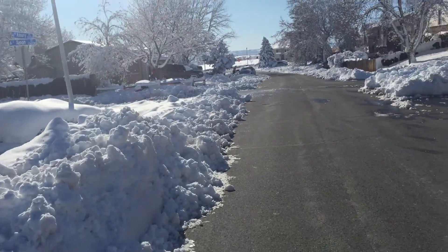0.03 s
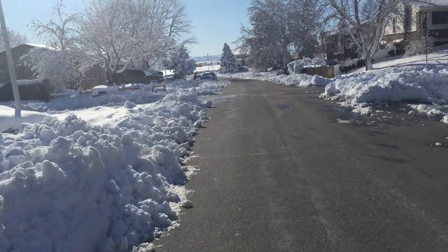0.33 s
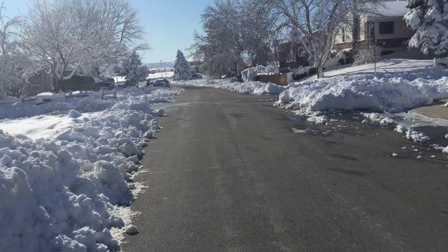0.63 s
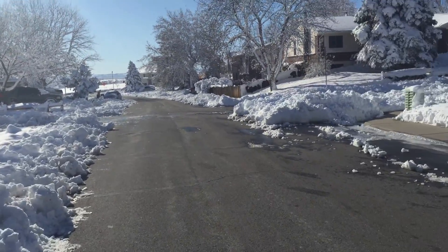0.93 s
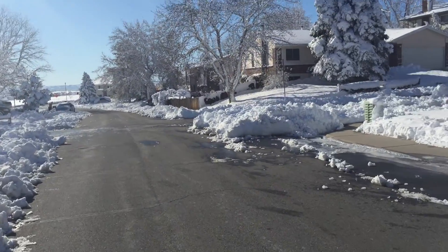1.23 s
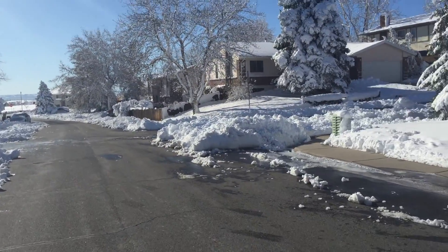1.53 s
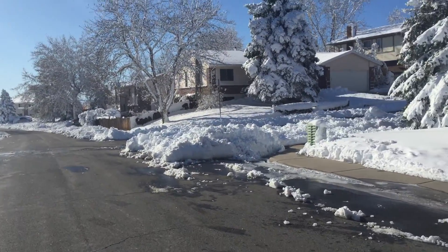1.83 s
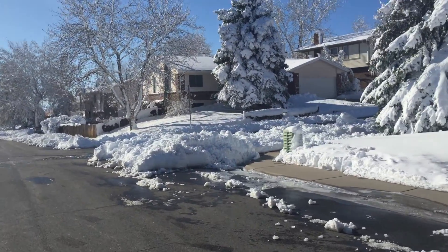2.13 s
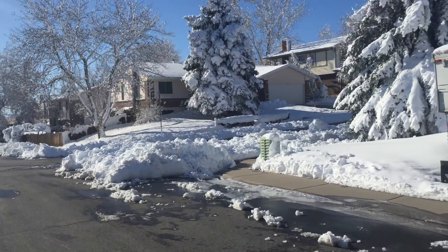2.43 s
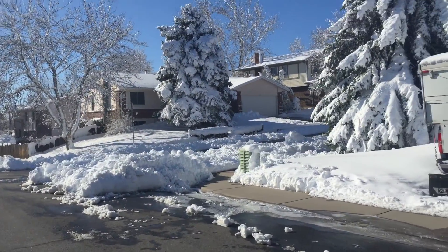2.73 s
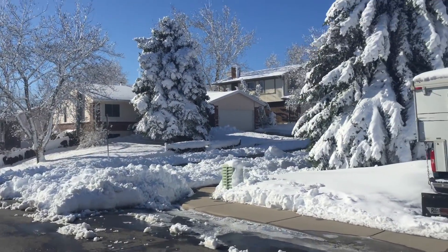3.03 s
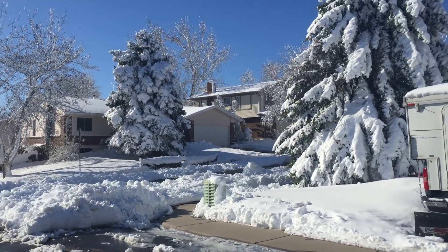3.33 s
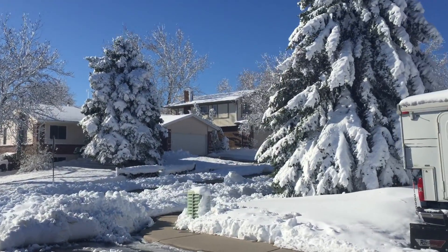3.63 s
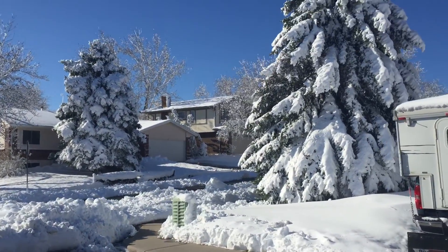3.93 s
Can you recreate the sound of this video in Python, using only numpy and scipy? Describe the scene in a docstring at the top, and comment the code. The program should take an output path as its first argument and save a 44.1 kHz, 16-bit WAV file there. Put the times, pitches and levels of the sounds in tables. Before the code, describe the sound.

A small bird warbles quick slurred notes, then gives a rising whistle and two buzzy notes in a snowy street. Low wind buffets the hand-held microphone, with soft handling knocks, faint drips and a hush of far traffic.

```python
"""Wind buffets the microphone of a hand-held camera, which picks up soft knocks as it moves.
All along, melting snow drips and ticks over the hush of far traffic and a faint whine.
From 0.2 s a finch warbles quick slurred syllables; at 2.6 s it gives a rising whistle,
and from 2.9 s two buzzy notes. A far, hoarse call comes just before the end.
The houses of the snowy street return a faint echo of the birds and the thaw."""
import sys
import numpy as np
from scipy import signal
from scipy.fft import rfft, irfft
from scipy.io import wavfile
from scipy.ndimage import uniform_filter1d, map_coordinates

SR = 44100
rng = np.random.default_rng(int(sys.argv[2]) if len(sys.argv) > 2 else 0)


def inscribe(sig):
    """Save sig as 16-bit PCM at rate SR to the path in sys.argv[1].

    A 1-D sig is mono; a 2-D sig holds one channel per row.
    Samples are clipped to [-1, 1] before scaling.
    """
    pcm = np.round(np.clip(np.atleast_2d(sig).T, -1, 1) * 32767)
    wavfile.write(sys.argv[1], SR, pcm.astype(np.int16))


N = 176400  # 4 seconds


def warble():
    """The finch's quick run of syllables, with close reflections."""
    # Each row: start in seconds, length in seconds, level in dB before the trim,
    # then pitch in Hz at the start, one third, two thirds and the end.
    syllables = [ (0.207, 0.052, -69.5, 3730, 3760, 3750, 3300), (0.459, .04, -68, 3600, 4200, 3800, 2900),
                 (0.608, 0.029, -64.5, 4360, 4100, 3940, 3900),
                 (0.75, 0.047, -62.5, 4640, 4260, 4200, 4500), (.88, .055, -57, 4700, 4250, 3450, 2950),
                 (.993, .045, -60, 3550, 3480, 3050, 2850), (1.035, .04, -59, 3200, 4250, 3800, 2900),
                 (1.122, .05, -64, 4200, 4350, 4500, 4000), (1.154, 0.058, -56, 4330, 3640, 2600, 2200),
                 (1.294, 0.045, -60.5, 3140, 3400, 3540, 4000),
                 (1.336, 0.043, -54.5, 3700, 3100, 2940, 2900),
                 (1.427, .038, -51.5, 4330, 4000, 4000, 5000), (1.457, .026, -58, 4050, 4050, 4050, 3950),
                 (1.52, .022, -53, 4400, 4450, 4500, 4550), (1.548, .035, -52, 4700, 4200, 3500, 3050),
                 (1.646, .044, -49, 4200, 4170, 4130, 3950), (1.684, .027, -56, 4050, 3750, 3400, 3150),
                 (1.744, .063, -50, 5100, 4550, 4100, 3900), (1.797, .056, -52, 3950, 3730, 3770, 3680),
                 (1.942, .043, -57, 5000, 4830, 4480, 4350), (1.978, .06, -54, 3400, 3900, 3500, 2900),
                 (2.078, .067, -55, 4200, 3950, 3250, 3000), (2.205, .055, -61, 4100, 3400, 3950, 3600),
                 (2.293, .062, -53, 3350, 2780, 2400, 2030), (2.432, .03, -66, 3550, 3650, 3700, 3650),
                 (2.456, .02, -66, 4500, 4580, 4620, 4600), (2.467, 0.022, -61, 3570, 3600, 3450, 3500),
                 (2.491, 0.043, -56, 3980, 3300, 2800, 2900), (2.899, 0.0206, -58, 3570, 3200, 2900, 3040)]
    # Each row: time in seconds, hoarse share of the voice from 0 to 1.
    hoarseness = [(.2, 0.4), (.9, 0.44), (1.35, .3), (1.52, 0.13), (1.7, 0.14), (2.12, 0.34), (2.24, 0.56),
                  (2.3, 0.16), (2.5, 0.42)]
    out, trim_db = np.zeros(N), -3.5
    for start, length, db, *pitches in syllables:
        hoarse = curve(hoarseness, start)[0]
        add(out, start, amp(db + trim_db) * syllable(length, pitches, hoarse))
    return reflect(out, db=-10, fade_s=0.03)


def syllable(length, pitches, hoarse, fade_share=0.28, blur_hz=373.3):
    """One slide through four pitches that swells and fades; hoarseness blurs the pitch."""
    progress = np.arange(0, length, 1 / SR) / length
    hz = np.polyval(np.polyfit(np.arange(4) / 3, pitches, 3), progress)
    ramp = np.clip(np.minimum(progress, 1 - progress) / fade_share, 0, 1)
    blurred = unit(tone(hz + blur_hz * wander(len(hz), blur_hz)))
    return np.sin(np.pi / 2 * ramp) * unit((1 - hoarse) * voice(hz) + hoarse * blurred)


def voice(hz, jitter=0.005, overtone_db=-41, flutter_hz=132):
    """A bird's nearly pure tone, trembling slightly in pitch and loudness."""
    hz = hz * (1 + jitter * wander(len(hz), 2 * flutter_hz))
    flutter = amp(wander(len(hz), flutter_hz))  # about 1 dB either way
    return unit((tone(hz) + amp(overtone_db) * tone(2 * hz)) * flutter)


def whistle(catch_s=0.0053, catch_db=-26.5):
    """The finch's clean upward glide, broken by short catches where the level dips."""
    # Each row: time in seconds, pitch in Hz, level in dB.
    glide = [(2.61, 2076, -95), (2.645, 2030, -59), (2.668, 2190, -59), (2.703, 2400, -55),
             (2.735, 2610, -55.5), (2.76, 2694, -54.5), (2.8, 2886, -54.5), (2.825, 2890, -62),
             (2.834, 2880, -102)]
    # Each entry: time of a catch in seconds.
    catches = [2.648, 2.684, 2.722, 2.785]
    t = np.arange(glide[0][0], glide[-1][0], 1 / SR)
    hz, db = curve(glide, t)
    dips = sum(np.exp(-((t - s) / catch_s) ** 2) for s in catches)
    out = np.zeros(N)
    add(out, t[0], amp(db + catch_db * dips) * unit(tone(hz)))
    return out


def buzzy_notes():
    """A high note, then a rising one; the finch sings each with two voices at once."""
    # Each row, in all four: time in seconds, pitch in Hz, level in dB, swing of the trill in Hz.
    high_lower = [(2.925, 4520, -87, 24), (2.94, 4310, -60.5, 20), (2.96, 4230, -56.5, 40),
                  (3.0, 4580, -60, 30), (3.014, 4530, -63, 20), (3.024, 4400, -78, 20)]
    high_upper = [(2.935, 5000, -78, 99), (2.957, 5100, -68, 200), (2.985, 5250, -81, 149),
                  (3.02, 5140, -75, 101)]
    rising_lower = [(3.072, 2590, -101, 81), (3.085, 2590, -68.5, 100), (3.125, 2636, -73, 152),
                    (3.145, 2960, -66, 80), (3.185, 2730, -66, 217), (3.222, 2910, -56, 80),
                    (3.255, 3080, -64.5, 150), (3.29, 3020, -70, 149), (3.33, 3340, -65.5, 120),
                    (3.345, 3180, -64, 101)]
    rising_upper = [(3.205, 3350, -73, 99), (3.245, 3920, -67, 250), (3.285, 3950, -60, 195),
                    (3.325, 4000, -64.5, 150), (3.352, 4440, -63.5, 151), (3.372, 4480, -78, 100)]
    return (buzz(high_lower, pulse_hz=257, sweep_hz=130, depth=0.47, trill_hz=64, uneven=0.2)
            + buzz(high_upper, pulse_hz=252, sweep_hz=303, depth=0.92, trill_hz=68, uneven=0.18)
            + buzz(rising_lower, pulse_hz=224, sweep_hz=190, depth=0.4, trill_hz=78.5, uneven=0.2)
            + buzz(rising_upper, pulse_hz=243.5, sweep_hz=220, depth=0.7, trill_hz=74.2, uneven=0.06))


def buzz(rows, pulse_hz, sweep_hz, depth, trill_hz, uneven):
    """Fast pulses, each sliding down in pitch, riding on a slower trill."""
    t = np.arange(rows[0][0], rows[-1][0], 1 / SR)
    hz, db, swing = curve(rows, t)
    pulse_rate = pulse_hz * (1 + uneven * wander(len(t), pulse_hz))
    phase = 2 * np.pi * np.cumsum(pulse_rate) / SR
    trill = np.sin(2 * np.pi * trill_hz * (t - t[0]))
    pitch = hz + swing * trill - sweep_hz * np.sin(phase)
    pulses = 1 + depth * np.cos(phase)
    out = np.zeros(N)
    add(out, t[0], amp(db) * unit(pulses * voice(pitch)))
    return out


def far_call():
    """A distant bird; slower pulses make its call hoarse."""
    # Each row: time in seconds, pitch in Hz, level in dB, swing of the trill in Hz.
    call = [(3.86, 1605, -89, 60), (3.9, 1680, -71.5, 60), (3.935, 1790, -72, 60), (3.96, 1690, -84, 60)]
    return buzz(call, pulse_hz=107, sweep_hz=110, depth=0.34, trill_hz=30.4, uneven=0.24)


def wind(bass_boost_db=1, lumps_db=6):
    """Air swirls at the microphone: a bass rumble and a lumpier flutter above it."""
    # Each row, in both: frequency in Hz, relative strength in dB.
    bass_tone = [(15, -40.5), (30, -3.5), (45, -4.5), (62, 3), (100, -2.5), (140, -9), (190, -31.5),
                 (300, -50), (1000, -100)]
    body_tone = [(60, -27), (120, -12), (165, 7), (230, -4), (300, -12.5), (420, -42), (800, -45),
                 (3000, -86)]
    # Each row, in both: time in seconds, level in dB before the boost or the lumps.
    bass_gusts = [(0.0, -63.5), (0.09, -50), (0.18, -64.5), (0.23, -51.5), (0.3, -63.5), (0.58, -41.5),
                  (0.6, -35), (0.65, -52), (0.97, -44), (1.0, -56), (1.08, -37), (1.16, -48.5), (1.21, -36),
                  (1.32, -42.5), (1.36, -33.5), (1.55, -55.5), (1.61, -23.5), (1.66, -40.5), (1.95, -44),
                  (1.99, -30), (2.07, -41), (2.12, -34.5), (2.46, -32), (2.49, -49.5), (2.55, -30),
                  (2.61, -43), (2.65, -28.5), (2.7, -40), (2.78, -36), (2.83, -44), (2.94, -36),
                  (2.99, -45), (3.09, -47), (3.11, -36), (3.39, -50), (3.43, -36), (3.51, -56.5),
                  (3.63, -36), (3.66, -47), (3.75, -32), (3.82, -59), (3.88, -43.5), (3.98, -38.5),
                  (4.0, -68)]
    body_gusts = [(0.0, -66), (0.46, -66), (0.6, -55.5), (0.71, -68.5), (0.8, -58), (0.89, -69),
                  (0.91, -51), (0.98, -74), (1.0, -55), (1.34, -51.5), (1.47, -56.5), (1.51, -46),
                  (1.54, -58), (1.61, -34.5), (1.65, -65), (1.67, -42), (1.69, -60), (1.75, -53),
                  (1.88, -72), (1.92, -47.5), (1.96, -38.5), (2.06, -58), (2.12, -40.5), (2.16, -64),
                  (2.18, -45.5), (2.39, -41), (2.49, -58), (2.55, -41.5), (2.57, -52), (2.65, -39.5),
                  (2.68, -57), (2.73, -37.5), (2.87, -78), (2.91, -32), (2.93, -48), (2.96, -86),
                  (3.06, -70), (3.1, -46), (3.22, -51.5), (3.25, -62.5), (3.44, -57.5), (3.51, -76),
                  (3.56, -48), (3.6, -61), (3.78, -47), (3.82, -69), (3.84, -54.5), (4.0, -65)]
    t = np.arange(N) / SR
    bass = steady(noise(bass_tone), samples=1800) * amp(curve(bass_gusts, t)[0] + bass_boost_db)
    body = steady(noise(body_tone), samples=1200) * amp(curve(body_gusts, t)[0])
    lumps = unit(amp(lumps_db * wander(N, 45)))
    return bass + body * lumps


def buffets():
    """Heavy, low thumps of wind on the microphone."""
    # Each row: start in seconds, pitch in Hz, level in dB.
    thumps = [(.588, 95.4, -22), (1.6, 80, -23.5), (1.98, 78.5, -30.5), (2.64, 78, -34), (2.918, 97, -27)]
    return taps(thumps, rise_s=0.0086, grit=0.11, spread=0.77)


def knocks():
    """Soft knocks on the moving camera."""
    # Each row: start in seconds, pitch in Hz, level in dB.
    bumps = [(.291, 530, -46.5), (.52, 317, -43), (.549, 256, -43), (.597, 520, -46), (.79, 378, -44),
             (1.321, 466, -51.5), (1.506, 230, -37), (1.565, 740, -47.5), (1.574, 810, -48),
             (1.663, 263, -27.5), (1.754, 600, -49), (1.828, 700, -50), (1.95, 232, -40), (2.289, 322, -43),
             (2.291, 616, -49.5), (2.325, 270, -52), (2.594, 328, -36), (2.717, 580, -43), (2.73, 246, -42),
             (2.906, 315, -35), (3.203, 480, -44), (3.56, 324, -47), (3.7, 600, -46), (3.768, 332, -32.5),
             (3.77, 584, -49), (3.937, 294, -45.5)]
    return taps(bumps, rise_s=0.0027, grit=0.28, spread=0.43)


def thaw():
    """Meltwater drips, and ice gives crisp ticks."""
    # Each row, in both: start in seconds, pitch in Hz, level in dB.
    drips = [(.104, 1940, -54), (.11, 880, -56), (.293, 810, -55.5), (1.08, 1065, -52.5),
             (1.087, 2100, -59.5), (1.239, 1870, -57.5), (1.259, 898, -51.5), (1.505, 1850, -41),
             (1.572, 2070, -56.5), (1.579, 935, -42.5), (1.897, 1280, -59.5), (2.179, 2050, -57.5),
             (2.551, 1600, -57.5), (3.006, 1090, -53), (3.507, 790, -54), (3.754, 1690, -63.5)]
    ticks = [(.407, 4450, -64), (.947, 5700, -69), (1.239, 4960, -57.5)]
    return (taps(drips, rise_s=0.0032, grit=0.62, spread=0.4)
            + taps(ticks, rise_s=0.002, grit=1.0, spread=0.24))


def patter(count=70, low_hz=600, high_hz=2400):
    """Many faint, far drips at random moments."""
    rows = []
    for when, height, strength in rng.random((count, 3)):
        hz = low_hz * (high_hz / low_hz) ** height
        db = -63 + 2 * np.log(strength + 0.2)
        rows.append((when * N / SR, hz, db))
    return taps(rows, rise_s=0.002, grit=0.33, spread=1.0)


def taps(rows, rise_s, grit, spread):
    """Rings that die fast. Grit is their share of noise; spread is its width around the pitch."""
    out, t = np.zeros(N), np.arange(8192) / SR
    freqs, shape = np.fft.rfftfreq(len(t), 1 / SR), swell(t / rise_s)
    for start, hz, db in rows:
        band = 1 / (1 + (np.log((freqs + 1) / hz) / spread) ** 4)
        rough = shape * irfft(rfft(rng.standard_normal(len(t))) * band)
        rough *= np.linalg.norm(shape) / np.linalg.norm(rough)
        ring = shape * np.sin(2 * np.pi * hz * t)
        add(out, start, amp(db) * ((1 - grit) * ring + grit * rough))
    return out


def hush(split_hz=2520, waver_db=3.2):
    """Far traffic and air: a wavering murmur under a steadier hiss."""
    # Each row: frequency in Hz, relative strength in dB.
    air_tone = [(180, -26), (300, 4.5), (354, 1), (467, -7.5), (682, -0.5), (844, -7.5), (932, -6.5),
                (1320, -12.5), (2050, -10.5), (2940, -20.5), (4220, -19), (8840, -25.5), (10400, -30.5),
                (12100, -28.5), (15200, -30)]
    # Each row: time in seconds, typical murmur level in dB, hiss level in dB.
    levels = [(0, -65.5, -75.5), (.6, -69, -75), (1.2, -66.5, -73), (1.8, -69, -75), (2.4, -67.5, -75.5),
              (3.2, -69.5, -75), (4, -68.5, -76)]
    murmur_db, hiss_db = curve(levels, np.arange(N) / SR)
    air = noise(air_tone)
    low = signal.sosfiltfilt(signal.butter(2, split_hz, fs=SR, output="sos"), air)
    murmur = unit(low) * amp(murmur_db + waver_db * wander(N, 24.08))
    return murmur + unit(air - low) * amp(hiss_db)


def whine(hz=1120, jitter=0.0066):
    """A faint, far tone that comes and goes."""
    # Each row: time in seconds, level in dB.
    levels = [(0, -83.5), (1.5, -94), (1.62, -77), (1.78, -73.5), (1.9, -84), (2.15, -89), (2.3, -72),
              (2.5, -87), (3.7, -91.5), (3.9, -83), (4, -71)]
    db = curve(levels, np.arange(N) / SR)[0]
    return amp(db) * unit(tone(hz * (1 + jitter * wander(N, 60))))


def flicker(rise_s=0.0054, trim_db=-5.5):
    """Brief, faint swells of the highest hiss."""
    # Each row: start in seconds, peak level in dB before the trim.
    swells = [(0.8782, -65.5), (0.9445, -63.5), (1.2408, -73), (1.4319, -63), (1.4643, -67), (1.5277, -63),
              (1.644, -63), (1.7626, -68), (1.8435, -69), (2.0226, -66.5), (2.0834, -72), (2.2974, -67),
              (2.5094, -69), (2.8991, -64.5)]
    # Each row: frequency in Hz, relative strength in dB.
    hiss_tone = [(1500, -32), (4000, -4), (6500, 2), (10000, -5), (15000, -9)]
    shape = swell(np.arange(0, 0.04, 1 / SR) / rise_s)
    level = np.zeros(N)
    for start, db in swells:
        add(level, start, amp(db + trim_db) * shape)
    return level * noise(hiss_tone)


def reflect(x, db, fade_s):
    """Adds scattered echoes from branches and houses, soon swallowed by snow."""
    t = np.arange(SR // 2) / SR
    echoes = rng.standard_normal(len(t)) * (rng.random(len(t)) < 0.02)
    tail = echoes * amp(-60 * t / fade_s) * (t > 0.003)
    return x + amp(db) * signal.fftconvolve(x, tail / np.linalg.norm(tail))[:N]


def amp(db):
    """Turns decibels into a multiplier."""
    return 10 ** (np.asarray(db) / 20)


def unit(x):
    """Scales a signal to an average power of 1."""
    return x / np.sqrt(np.mean(x ** 2) + 1e-20)


def curve(rows, t):
    """Reads a table's columns at the times t, with straight lines between rows."""
    times, *columns = np.transpose(rows)
    return [np.interp(t, times, column) for column in columns]


def add(mix, start, sound):
    """Mixes a sound in at a start time in seconds."""
    part = mix[max(round(start * SR), 0):][:len(sound)]
    part += sound[:len(part)]


def noise(points):
    """Noise whose tone follows points of frequency in Hz and strength in dB."""
    hz, db = np.transpose(points)
    freqs = np.fft.rfftfreq(N, 1 / SR)
    gain = amp(np.interp(np.log(freqs + 1), np.log(hz + 1), db))
    return unit(irfft(rfft(rng.standard_normal(N)) * gain, N))


def wander(size, hz):
    """A smooth random wobble of about 1 either way, changing hz times a second."""
    knots = rng.standard_normal(4000)
    return map_coordinates(knots, [np.arange(size) * hz / SR], order=3, mode="wrap")


def tone(hz):
    """A sine wave that follows a pitch curve."""
    return np.sin(2 * np.pi * np.cumsum(hz) / SR)


def swell(u):
    """A soft rise to 1 at u = 1, then a quick fall."""
    return (u * np.exp(1 - u)) ** 2


def steady(x, samples):
    """Evens out the slow random swells of a noise."""
    return x / np.sqrt(abs(uniform_filter1d(x ** 2, size=samples)) + 1e-6)


def scene():
    """Birds and thaw echo in the street; knocks, wind and background come without echo."""
    melting = thaw() + patter()
    bumps = knocks() + buffets()
    birds = warble() + whistle() + buzzy_notes() + far_call()
    street = reflect(birds + melting, db=-21, fade_s=0.2)
    return (street + bumps + wind() + hush() + whine() + flicker())[None]


def record(dry, low_hz=30.3, high_hz=15350):
    """Cuts away the deepest rumble and the very highest treble."""
    low_cut = signal.butter(3, low_hz, "high", fs=SR, output="sos")
    high_cut = signal.firwin(801, high_hz, window=("kaiser", 9), fs=SR)
    return signal.oaconvolve(signal.sosfiltfilt(low_cut, dry), high_cut[None], "same")


dry = scene()
out = record(dry)
inscribe(out)
```